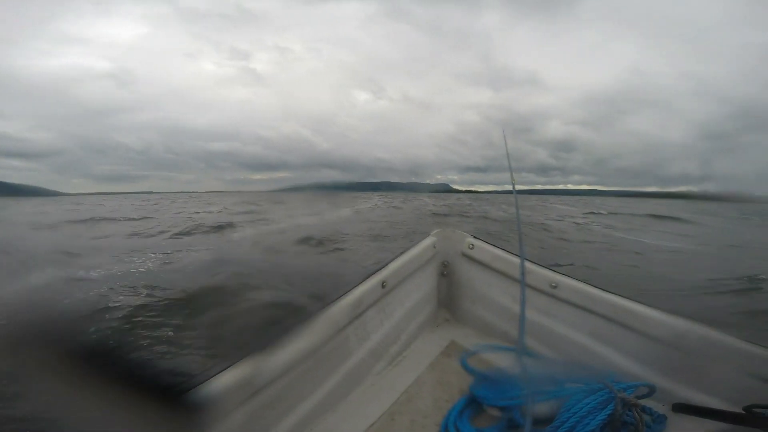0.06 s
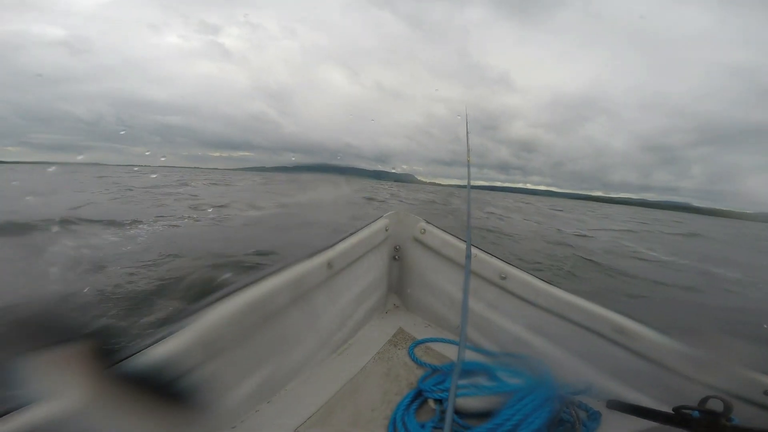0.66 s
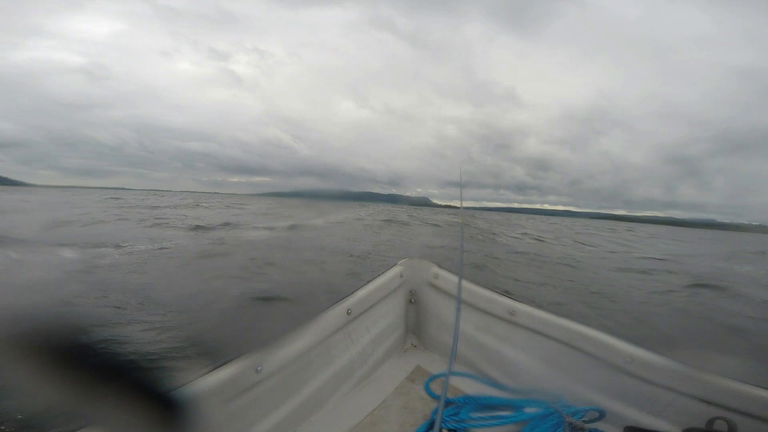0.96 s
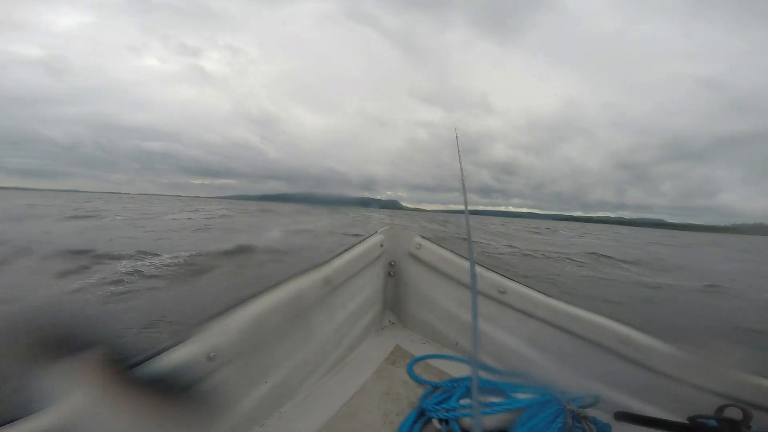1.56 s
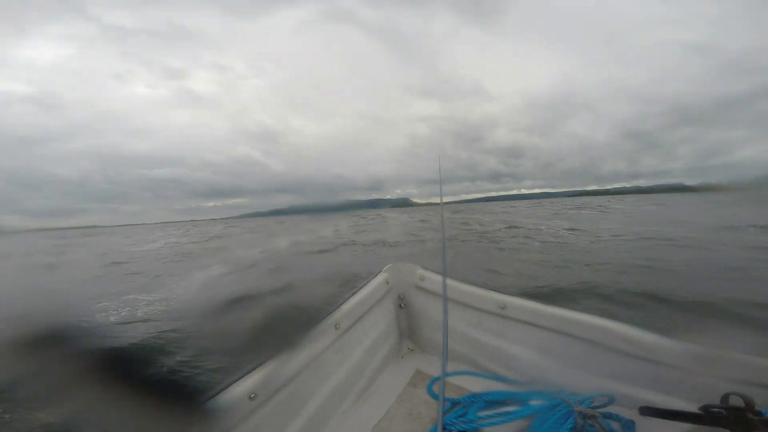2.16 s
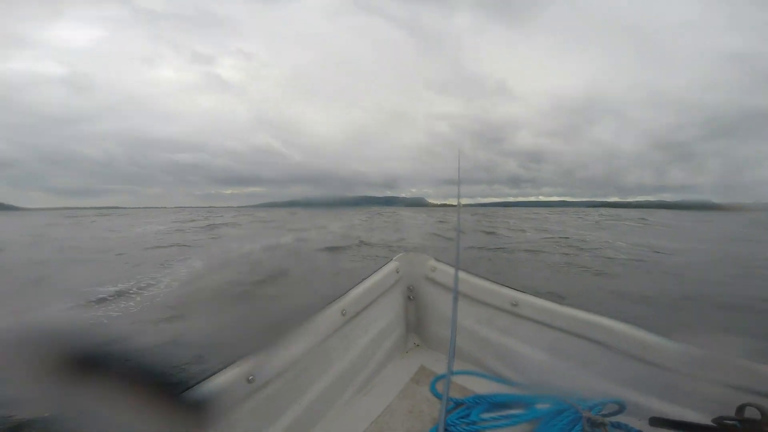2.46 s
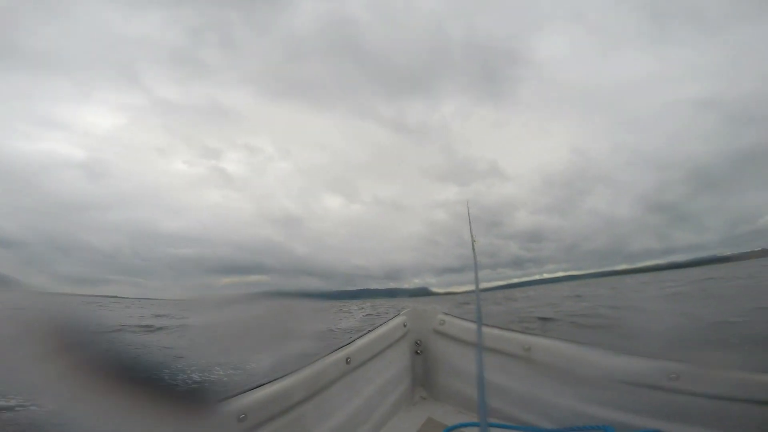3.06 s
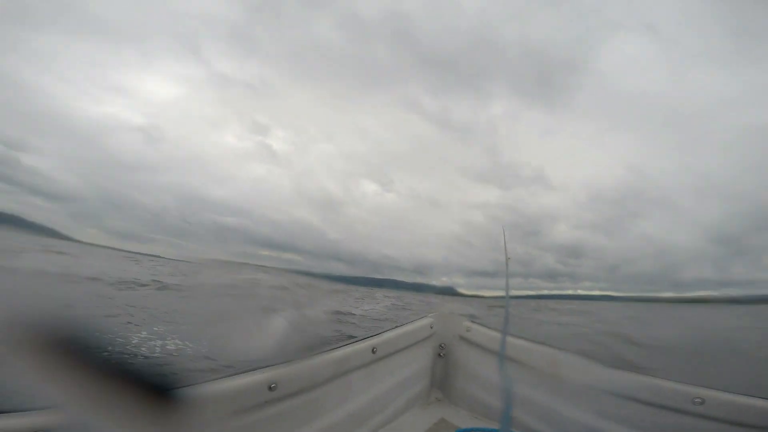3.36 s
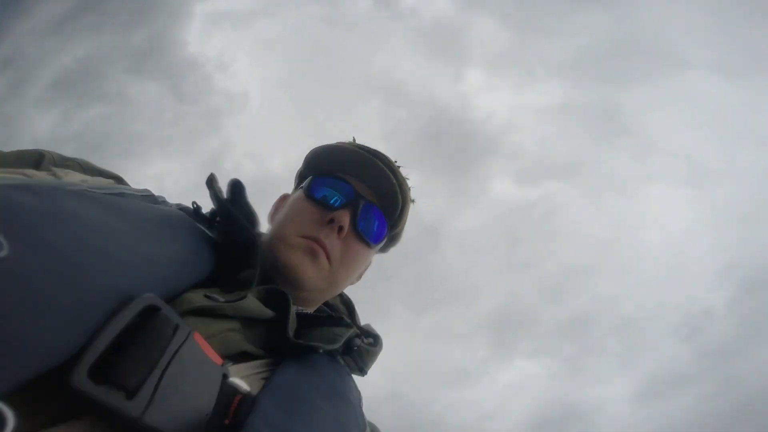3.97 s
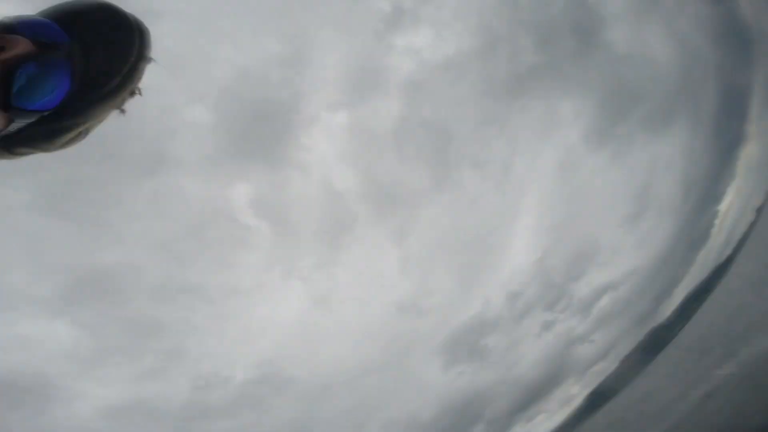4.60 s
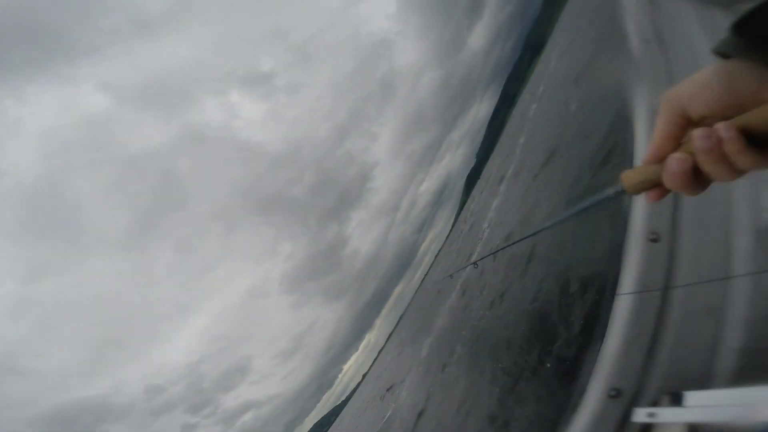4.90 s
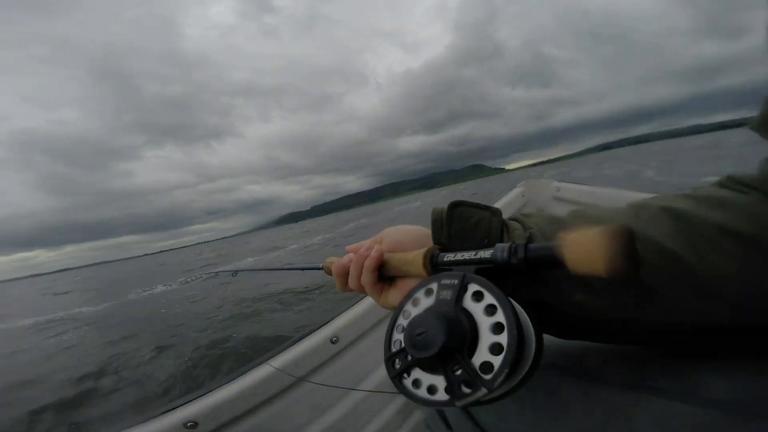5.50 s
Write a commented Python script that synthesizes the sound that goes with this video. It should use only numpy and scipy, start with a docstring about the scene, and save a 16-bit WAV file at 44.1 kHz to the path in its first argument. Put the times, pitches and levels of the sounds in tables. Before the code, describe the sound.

Low wind buffets an enclosed microphone on a small boat, with uneven surges of fizzing foam and spray and a few drops striking the plastic housing. Then handling takes over up close: booming bumps, sharp finger clicks and short scrapes. Everything goes silent for an instant, and the irregular knocking and rubbing resume, with a light rasp of jacket sleeves as the waves keep washing against the hull.

```python
"""On a small open boat in choppy water, heard from a camera in a waterproof plastic case.
Wind rumbles on the case, waves slosh, foam and spray along the hull, and drops strike the plastic.
Then the camera is grabbed and turned: the case booms and rumbles, fingers click and rub on it,
and jacket sleeves swish. The background dips at the roughest handling, and once all goes silent."""
import sys
import numpy as np
from scipy import signal
from scipy.fft import rfft, irfft
from scipy.io import wavfile
from scipy.ndimage import uniform_filter1d

SR = 44100
rng = np.random.default_rng(int(sys.argv[2]) if len(sys.argv) > 2 else 0)


def master_out(mix):
    """Clip the mix to full scale and print it as 16-bit PCM to the path in sys.argv[1]."""
    frames = np.transpose(np.atleast_2d(mix))
    ceiling = np.clip(frames, -1, 1)
    pcm = np.round(ceiling * 32767).astype(np.int16)
    wavfile.write(sys.argv[1], SR, pcm)


N = 244314
TIME = np.arange(N) / SR
TURN_S = 3.7  # once the camera is turned, the foam is fainter and the wind stronger


# Blows on the case; the grip sets pitch and damping (t/s, peak level/dB, f/Hz, time to fade 60 dB/s)
BLOWS = [(2.69, -25, 57.5, 0.31), (2.737, -21, 144.4, 0.2), (2.818, -18.5, 169, 0.2),
         (2.8683, -1.5, 101, 0.035), (2.8997, -1, 151, 0.051), (3.023, -17.5, 151.3, 0.2),
         (3.419, -14.5, 64.5, 0.018), (3.995, -26, 179, 0.071), (4.036, -19.5, 398, 0.029),
         (4.044, -15.5, 147, 0.068), (4.0635, -4, 169, .11), (4.0874, -14.5, 178, 0.046),
         (4.105, -29, 205, 0.035), (4.133, -15.5, 132.5, 0.044), (4.2065, -11.5, 168.2, 0.11),
         (4.339, -16, 117, 0.019), (4.41, -5.5, 162.8, 0.095), (4.812, -15, 144, 0.044),
         (4.832, -16.5, 34.2, 0.14), (4.85, -22.5, 348, 0.041), (4.852, -17, 197, 0.069),
         (5.022, -14, 144, 0.033), (5.099, -13, 202, 0.044), (5.103, -22, 416, 0.013),
         (5.1427, -8.5, 125, 0.04), (5.2, -3, 74, .05), (5.201, -19, 380, .02), (5.2125, -10, 220, .02),
         (5.468, -12, 146, 0.014)]
def knocks():
    """Each blow makes the case boom on its mount, damped by the hand, while its wall rings faintly."""
    out, t = np.zeros(N), np.arange(SR // 3) / SR
    wall_hz, wall_db, wall_fade_s = 1560, -41, 0.41
    wall = gain_of(wall_db - 60 * t / wall_fade_s) * np.sin(2 * np.pi * wall_hz * t)
    attack = 1 - np.exp(-t / 0.0025)
    for s, db, hz, fade_s in BLOWS:
        boom = -np.sin(2 * np.pi * hz * t) * attack * gain_of(-60 * (t / fade_s) ** 1.39)
        ring = wall * gain_of(-20 * t / fade_s)
        swing = min(gain_of(db), .85)
        add(out, s, swing * (boom / abs(boom).max() + ring))
    return out


# Tone of a finger's tap (f/Hz, level/dB)
TAP_TONE = [(60, 3), (300, 5), (1000, -5), (1550, 0.5), (2100, -1.5), (2700, 0.5), (3700, -12), (5500, -5),
            (8000, -18), (11000, -23.5), (15000, -24.5)]
# Finger taps (t/s, level/dB, treble cutoff/Hz, chatter time/s, ring f/Hz, ring boost/dB)
TAPS = [(2.841, -21.5, 2350, 0.042, 1940, 9), (2.8954, -16.5, 6000, 0.027, 403, 8.5),
        (3.0191, 1.5, 6860, 0.019, 3150, 11), (3.3813, -32, 6440, 0.0044, 910, 5),
        (3.4862, -31.5, 3000, 0.0085, 2000, 34), (3.998, -37.5, 4000, 0.015, 1100, 6),
        (4.037, -31, 1810, 0.03, 550, 5.5), (4.064, -27.5, 1290, 0.0098, 497, 5),
        (4.2043, -22, 1600, 0.012, 587, 13.5), (4.347, -19.5, 3500, 0.03, 1710, 12),
        (4.403, -10.5, 2450, 0.03, 695, 11), (4.5065, -32.5, 2020, 0.025, 450, 15),
        (4.8081, -5.5, 2560, 0.01, 2120, 14.5), (5.021, -20.5, 6000, 0.0094, 4220, 10),
        (5.211, -11, 1030, 0.013, 2140, 20), (5.3512, -24, 5000, 0.018, 1900, 19)]
def finger_taps():
    """Fingers click on the case, and each spot they strike rings at its own pitch."""
    out = np.zeros(N)
    for s, db, cutoff_hz, chatter_s, ring_hz, ring_db in TAPS:
        response = case_response(TAP_TONE, cutoff_hz, spot=[(ring_hz, 650, ring_db)])
        add(out, s, gain_of(db) * strike(response, chatter_s))
    return out


# Tone of skin dragging on plastic (f/Hz, level/dB)
RUB_TONE = [(150, 3.5), (450, -2.5), (1000, -18.5), (1400, 1.5), (2000, 4), (2800, -1.5), (4500, -5.5),
            (6000, -10), (7500, -11.5), (10000, -13), (13000, -17.5), (15000, -23.5)]
# Finger drags (start/s, strongest/s, end/s, level/dB, treble cutoff/Hz, creak f/Hz, creak boost/dB)
DRAGS = [(2.647, 2.671, 2.69, -34, 4000, 2000, 11), (2.716, 2.7, 2.88, -36, 4370, 2770, 11),
         (2.862, 2.925, 2.95, -29, 9500, 1650, 6), (2.922, 2.948, 2.975, -19, 8000, 1600, 9),
         (3.018, 3.051, 3.059, -23.5, 7000, 3200, 6), (4.04, 4.095, 4.135, -35, 2000, 540, 19),
         (4.335, 4.355, 4.42, -36, 3160, 2000, 14), (4.383, 4.388, 4.41, -37.5, 14000, 3360, 4),
         (4.381, 4.404, 4.42, -22.5, 3670, 2340, 13.5), (5.085, 5.105, 5.18, -35, 1200, 420, 14),
         (5.196, 5.206, 5.235, -25, 1000, 520, 12), (5.417, 5.54, 6.6, -34, 7240, 2520, 17)]
def finger_rubs():
    """Skin sticks and slips on the plastic, harder and harder until it lets go."""
    out = np.zeros(N)
    slips = impacts(2500, spread_db=3) + .5 * rng.standard_normal(N)
    for start, top, end, db, cutoff_hz, creak_hz, creak_db in DRAGS:
        response = case_response(RUB_TONE, cutoff_hz, spot=[(creak_hz, 380, creak_db)])
        scrape = signal.oaconvolve(slips, response)[:N]
        out += gain_of(db) * unit_level(scrape) * np.interp(TIME, [start, top, end], [0, 1, 0])
    return out


# Tone of a drop's impact (f/Hz, level/dB)
DROP_TONE = [(60, -5), (250, 7.5), (700, 0), (1550, -16.5), (2500, 3), (3200, -4.5), (4300, 0), (5200, 0.5),
             (6500, -18.5), (8000, -16.5), (9800, -3.5), (11500, -25), (15000, -25.5)]
# Drops landing (t/s, level/dB, chatter time/s)
DROP_HITS = [(0.8028, -8.5, 0.0086), (1.0965, -30.5, 0.0011), (1.479, -37, 0.0027), (3.514, -38.5, 0.0029)]
def water_drops():
    """Drops of water strike the case with a hard, bright tick."""
    out = np.zeros(N)
    for s, db, chatter_s in DROP_HITS:
        add(out, s, gain_of(db) * strike(case_response(DROP_TONE), chatter_s))
    return out


# Pitches at which the plastic case rings (f/Hz, width/Hz, boost/dB)
CASE_RINGS = [(630, 220, 5), (1520, 410, 8.5), (2433, 120, 4), (3416, 140, 5.5), (4220, 220, 5.5),
              (5630, 360, 3.5), (6420, 440, 6), (9200, 270, 6.5), (9010, 1200, -0.5), (12200, 900, 4.5)]
def case_response(tone, cutoff_hz=SR, spot=(), size=4096):
    """How the case rings after one push; the softer the contact, the less treble."""
    hz = abs(np.fft.fftfreq(size, 1 / SR))
    boost_db = sum(db / (1 + (2 * (hz - centre) / width) ** 2)
                   for centre, width, db in [*CASE_RINGS, *spot])
    gain = gain_of(tone_db(tone, hz) + boost_db) / np.hypot(1, (hz / cutoff_hz) ** 2.38)
    log_spectrum = np.conj(signal.hilbert(np.log(gain + 1e-6)))  # puts the ringing after the push
    return np.fft.ifft(np.exp(log_spectrum)).real[:size // 2]


def strike(response, chatter_s, size=2048):
    """A contact chatters briefly, evenly over all pitches, and rings the case."""
    t = np.arange(size) / SR
    chatter = rfft(rng.standard_normal(size) * gain_of(-60 * t / chatter_s))
    force = irfft(chatter / (abs(chatter) + 1e-9)) * gain_of(-20 * t / chatter_s)
    tap = signal.fftconvolve(force, response)
    return tap / np.linalg.norm(tap) * np.sqrt(0.0009 * SR)  # same energy for every strike


# Sleeves brushing past (start/s, end/s, level/dB, first f/Hz, last f/Hz)
SLEEVE_MOVES = [(4.334, 4.374, -44, 4150, 4100), (4.537, 4.71, -65, 6700, 6800),
                (4.772, 4.853, -57.5, 11000, 7160), (4.84, 4.95, -49, 6394, 6200),
                (4.907, 5.057, -49, 5850, 5310), (5.072, 5.119, -37, 3480, 3460),
                (5.123, 5.156, -43, 3320, 3600), (5.148, 5.32, -46.5, 4200, 4130)]
def sleeve_swishes():
    """The weave of a sleeve rasps at a pitch that follows the speed of the arm; faster is broader."""
    out = np.zeros(N)
    weave = rng.standard_normal(N) * flicker(260, spread_db=2.2)
    for start, end, db, first_hz, last_hz in SLEEVE_MOVES:
        rasp = weave[int(start * SR):][:int((end - start) * SR)]
        hz, width_hz = np.linspace(first_hz, last_hz, len(rasp)), (first_hz / 175) ** 2
        rasp = resonate(resonate(rasp, hz, width_hz), hz, width_hz)
        add(out, start, gain_of(db) * unit_level(rasp) * signal.windows.tukey(len(rasp), .7))
    return out


# Tones of the low slosh, the rushing foam and the high spray (f/Hz, level/dB)
SLOSH_TONE = [(150, -27.5), (280, 1.5), (450, -3.5), (680, -5), (900, -11.5), (1150, -10), (1600, -24),
              (3000, -50)]
FOAM_TONE = [(700, -38.5), (1150, -14), (1450, -1), (1800, 4.5), (2100, 0.5), (2450, -1), (2850, -8.5),
             (3150, -6.5), (3650, -16.5), (4500, -29), (7000, -51)]
SPRAY_TONE = [(1500, -16.5), (3200, 1.5), (4300, 2.5), (5000, -1), (5650, 3.5), (6150, -6.5), (6500, -4),
              (7300, -9.5), (8700, -13), (9600, -12), (10900, -20.5), (12300, -19.5), (14500, -26.5),
              (15300, -46)]
# Waves breaking on the hull (crest t/s, length/s, slosh level/dB, foam level/dB, spray level/dB)
HULL_WAVES = [(0.054, 0.087, -65, -34.5, -59), (0.168, 0.24, -48, -62, -59), (0.442, 0.6, -65, -42.5, -57),
              (0.967, 0.31, -46, -37, -45.5), (1.147, 0.092, -38.5, -34.5, -46.5),
              (1.307, 0.085, -51.5, -39, -56), (1.428, 0.24, -67, -40, -53), (1.698, 0.22, -56, -39, -42.5),
              (1.965, 0.029, -52, -36.5, -53), (2.19, 0.079, -57, -42, -61),
              (2.302, 0.15, -50.5, -39.5, -54.5), (2.503, 0.6, -72, -45.5, -50),
              (2.679, 0.12, -41.5, -42.5, -47), (3.268, 0.36, -52, -37.5, -52.5),
              (3.465, 0.066, -47, -36.5, -59), (4.042, 0.11, -55.5, -44, -47), (4.64, 0.39, -44, -33, -55),
              (4.811, .12, -40.5, -32.5, -44), (5.073, .16, -38.5, -31, -47), (5.218, 0.23, -43, -37, -51),
              (5.53, 0.14, -37.5, -30, -40.5)]
def waves():
    """Waves slosh at the hull, bubbly foam rushes by and spray falls back in droplets."""
    slosh = rng.standard_normal(N) + 0.17 * bubbles(900, 287, 1200, cycles=9)
    slosh = with_tone(slosh, SLOSH_TONE) * swell(HULL_WAVES, steady_db=-51.5, column=2)
    foam = rng.standard_normal(N) + 0.21 * bubbles(900, 1300, 3600, cycles=31)
    foam = with_tone(foam * flicker(24, spread_db=1.3), FOAM_TONE)
    foam *= swell(HULL_WAVES, steady_db=-44, column=3) * gain_of(-5 * (TIME > TURN_S))
    spray = rng.standard_normal(N) + .5 * impacts(1500, spread_db=6.5)
    spray = with_tone(spray * flicker(30, spread_db=0.84), SPRAY_TONE)
    spray *= swell(HULL_WAVES, steady_db=-56.5, column=4)
    return slosh + foam + spray


# Tone of the hiss at the front of the boat (f/Hz, level/dB)
BOW_TONE = [(1400, -22), (2150, 5), (2750, -0.5), (3200, 1), (3700, -29), (5000, -16), (5700, -10),
            (6500, -16), (7300, -41.5), (12000, -50.5)]
def bow_wave():
    """The bow wave hisses with tiny bubbles at first, then drops away."""
    level_db, fade_from_s, fade_db_per_s = -42.5, 1.23, 68
    fizz = rng.standard_normal(N) + 0.27 * bubbles(900, 2000, 6800, cycles=46)
    hiss = with_tone(fizz * flicker(40, spread_db=3.7), BOW_TONE)
    return hiss * gain_of(level_db - fade_db_per_s * np.maximum(TIME - fade_from_s, 0))


def bubbles(per_s, low_hz, high_hz, cycles, sizes=24):
    """Bubbles of many sizes ring briefly, rising in pitch."""
    out = np.zeros(N)
    for hz in np.geomspace(low_hz, high_hz, sizes):
        age = np.linspace(0, 1, int(cycles * SR / hz))
        ping = np.sin(2 * np.pi * cycles * age * (1 + .06 * age)) * np.exp(-4 * age)
        births = impacts(per_s / sizes, spread_db=3.5)
        out += signal.oaconvolve(births, ping / np.linalg.norm(ping))[:N]
    return unit_level(out)


# Tone of the low rumble (f/Hz, level/dB)
RUMBLE_TONE = [(10, 2), (30, 3.5), (75, -1), (105, -1.5), (155, 3), (205, -6), (270, -14), (450, -37.5),
               (900, -68)]
# Low swells from wind gusts and from shoves on the handled case (strongest t/s, length/s, level/dB)
RUMBLE_SWELLS = [(0.07, 0.28, -35), (0.65, 0.96, -36), (0.977, 0.08, -28), (1.165, 0.21, -30),
                 (2.695, 0.075, -22), (2.964, 0.086, -20.5), (3.198, 0.06, -24), (3.408, 0.13, -25.5),
                 (4.086, 0.056, -10.5), (4.44, 0.16, -22.5), (4.692, 0.13, -25), (4.815, 0.057, -25.5),
                 (5.148, 0.21, -25), (5.498, 0.08, -26)]
def wind_and_shoves():
    """Wind gusts and shoves on the handled case make a lumpy rumble swell, up to a ceiling."""
    turned_boost_db, ceiling_db = 3.5, -15
    strength = swell(RUMBLE_SWELLS, steady_db=-38, column=2)
    strength *= gain_of(turned_boost_db * (TIME > TURN_S)) * dips()
    rumble = with_tone(rng.standard_normal(N) * flicker(25, spread_db=0.83), RUMBLE_TONE)
    return rumble * np.minimum(strength, gain_of(ceiling_db))


# Very high tones (f/Hz, relative level/dB)
WHINE_PITCHES = [(11719, -3), (14626, -1)]
def whine():
    """Thin, slightly unsteady tones from the camera's electronics."""
    out = np.zeros(N)
    for hz, db in WHINE_PITCHES:
        wavering_hz = hz + 9 * drift(30)
        out += gain_of(db) * np.sin(2 * np.pi * np.cumsum(wavering_hz) / SR)
    return gain_of(-74.5) * out


# Dips in the background at the roughest handling (t/s, depth/dB)
LEVEL_DIPS = [(2.87, 8.5), (3.018, 20.5), (3.75, 14.5), (4.066, 9.5), (4.207, 10.5), (4.409, 12.5)]
def dips(recover_db_per_s=27.5):
    """A gain that drops at once and creeps back at a steady rate."""
    each_db = [(TIME >= s) * (db - recover_db_per_s * (TIME - s)) for s, db in LEVEL_DIPS]
    deepest_db = np.maximum(np.max(each_db, axis=0), 0)
    return gain_of(-uniform_filter1d(deepest_db, size=256))


def swell(rows, steady_db, column):
    """A steady level on which each row's swell builds up and dies away; column picks its level."""
    rise, fall, roundness = .6, .65, 1.34  # rise, fall: shares of the length; roundness 1 is pointed
    t = TIME[::64]
    power = np.full(len(t), gain_of(steady_db) ** 2)
    for row in rows:
        age = (t - row[0]) / row[1]
        hump = np.exp(-np.maximum(-age / rise, age / fall) ** roundness)
        power += (gain_of(row[column]) * hump) ** 2
    return np.interp(TIME, t, np.sqrt(power))


def impacts(per_s, spread_db):
    """Tiny hits at random times, a few of them large."""
    hits = (rng.random(N) < per_s / SR) * rng.choice([-1, 1], N)
    return unit_level(hits * gain_of(spread_db * np.minimum(rng.exponential(1, N), 4)))


def drift(rate_hz):
    """A smooth random wander, mostly slower than rate_hz."""
    hz = np.fft.rfftfreq(N, 1 / SR)
    return unit_level(irfft(rfft(rng.standard_normal(N)) / (1 + (hz / rate_hz) ** 4), N))


def flicker(rate_hz, spread_db):
    """A gain that wavers at random."""
    return gain_of(spread_db * drift(rate_hz))


def resonate(x, hz, width_hz):
    """Keeps the part of x near a moving pitch."""
    turn = np.exp(2j * np.pi * np.cumsum(hz) / SR)
    feedback = np.exp(-np.pi * width_hz / SR)
    return 2 * (turn * signal.lfilter([1 - feedback], [1, -feedback], x / turn + 1e-18)).real


def with_tone(x, tone):
    """Shapes the lows and highs of x by a tone table, at an average level of 1."""
    gain = gain_of(tone_db(tone, np.fft.rfftfreq(N, 1 / SR)))
    return unit_level(irfft(rfft(x) * gain, N))


def tone_db(tone, hz):
    """Reads between the points of a tone table, along a musical (log) pitch scale."""
    points_hz, db = np.transpose(tone)
    return np.interp(np.log(hz + 1), np.log(points_hz), db)


def gain_of(db):
    """Decibels to gain."""
    return 10 ** (np.asarray(db) / 20)


def unit_level(x):
    """Scales x to an average (rms) level of 1."""
    return x / np.sqrt(np.mean(x ** 2) + 1e-20)


def add(mix, s, sound):
    """Mixes a sound in at time s."""
    part = mix[max(round(s * SR), 0):][:len(sound)]
    part += sound[:len(part)]


def scene():
    """The sea and the handling, at one microphone."""
    background = wind_and_shoves() + (waves() + bow_wave() + whine()) * dips()
    close_by = knocks() + finger_taps() + finger_rubs() + water_drops() + sleeve_swishes()
    return (close_by + background)[None]


def record(dry):
    """The hardest blows overload, all goes silent for a moment, and the highest treble is cut."""
    pause_s, length_s, fade_s, pause_db = 3.589, .187, .011, -60
    inside_s = np.minimum(TIME - pause_s, pause_s + length_s - TIME)
    pause = gain_of(pause_db * np.clip(inside_s / fade_s, 0, 1))
    treble_cut = signal.firwin(511, cutoff=15750, window=("kaiser", 9), fs=SR)
    return signal.oaconvolve(np.clip(dry, -1, 1) * pause, treble_cut[None], "same")


dry = scene()
out = record(dry)
master_out(out)
```